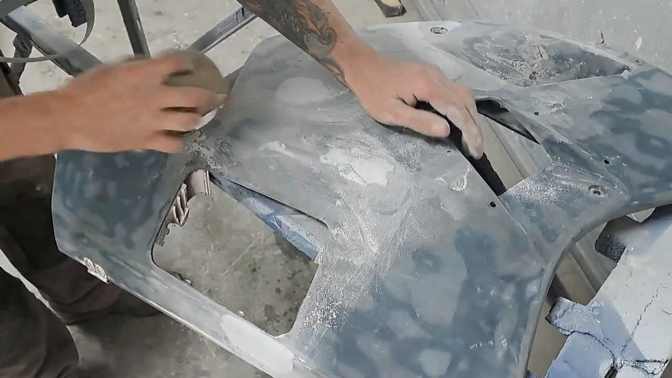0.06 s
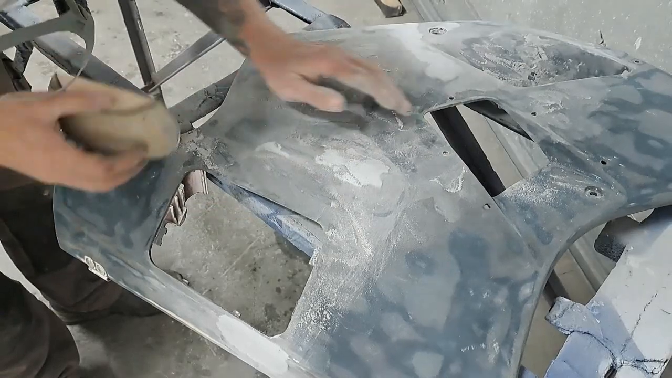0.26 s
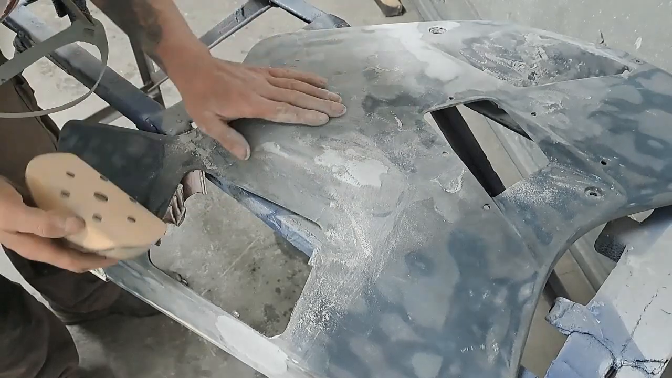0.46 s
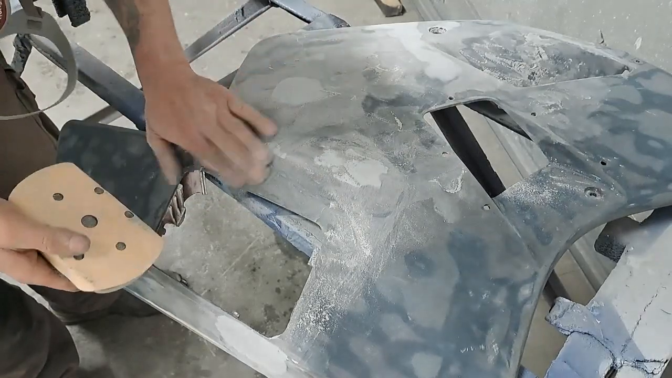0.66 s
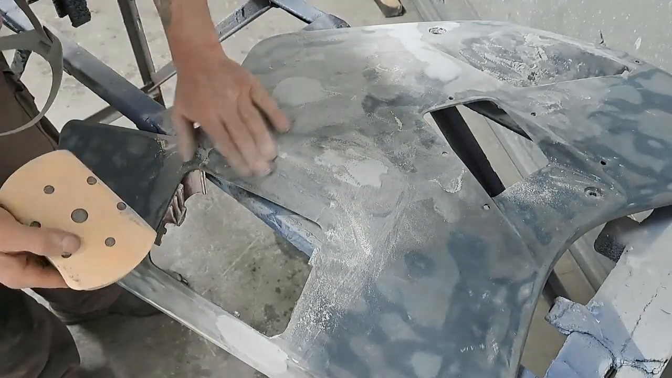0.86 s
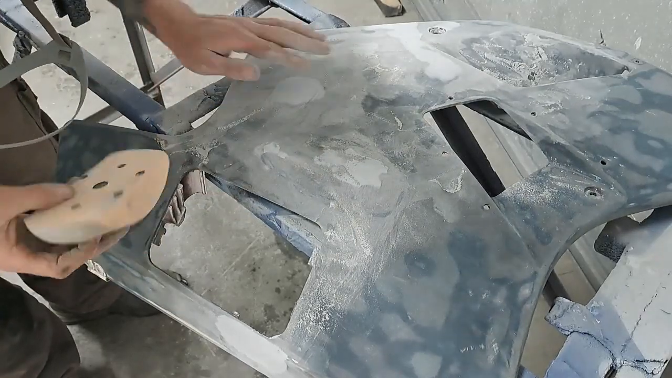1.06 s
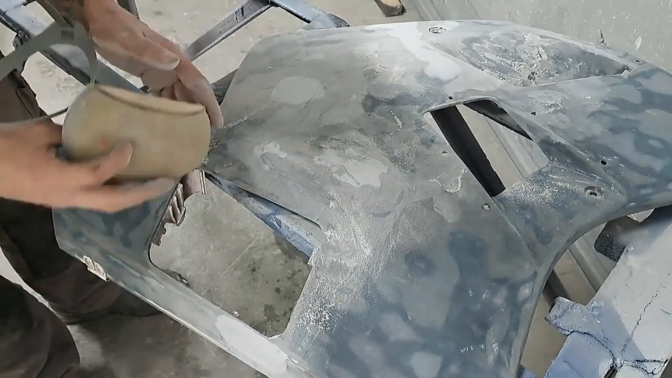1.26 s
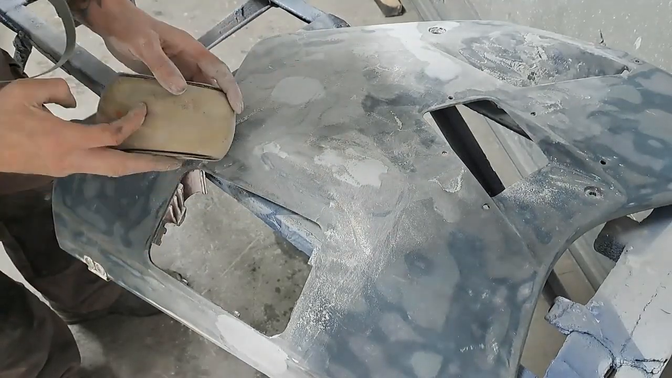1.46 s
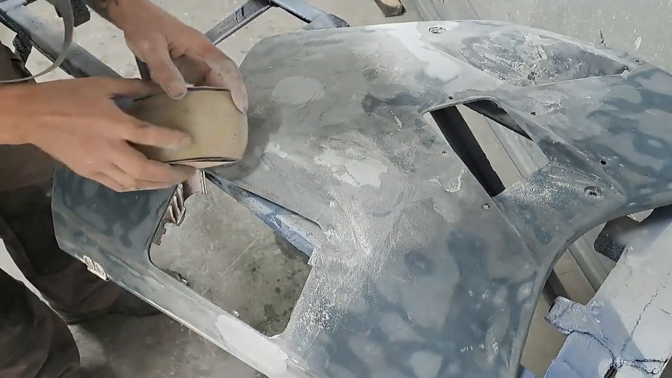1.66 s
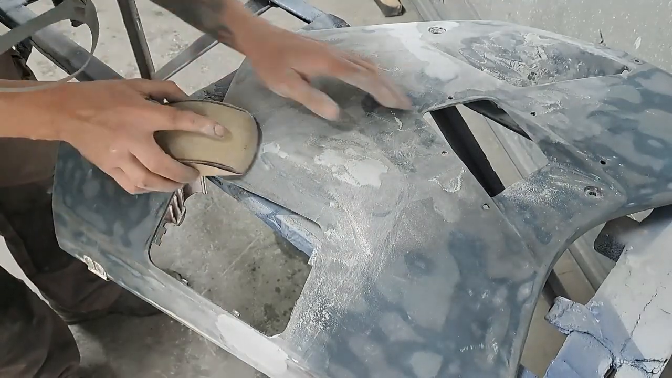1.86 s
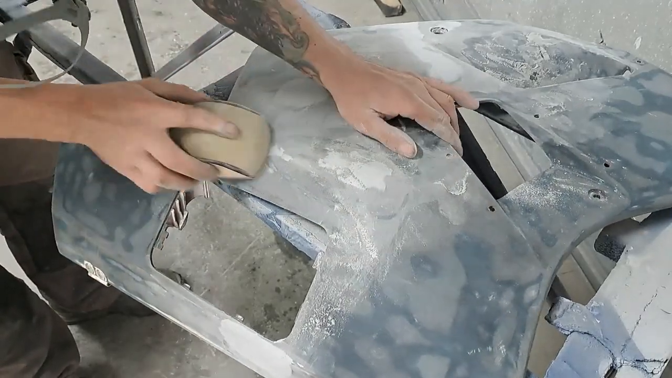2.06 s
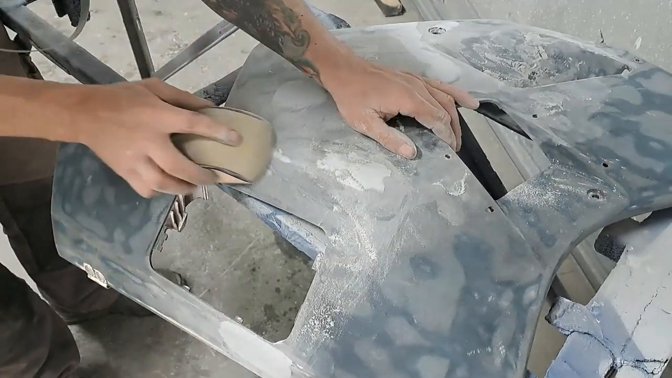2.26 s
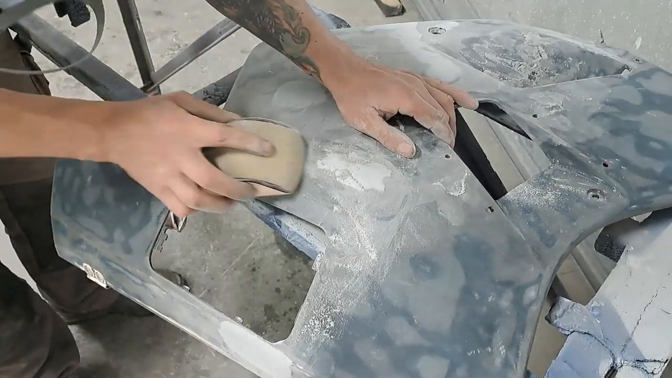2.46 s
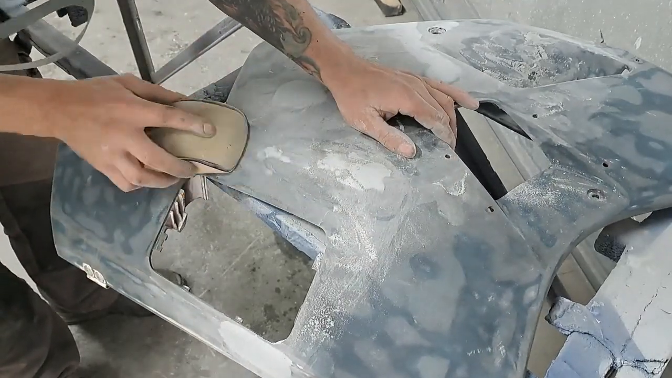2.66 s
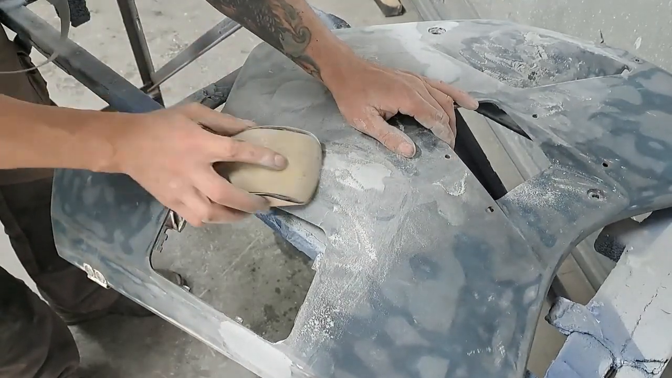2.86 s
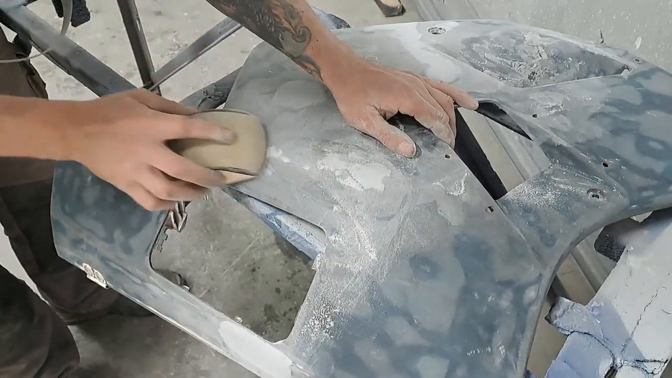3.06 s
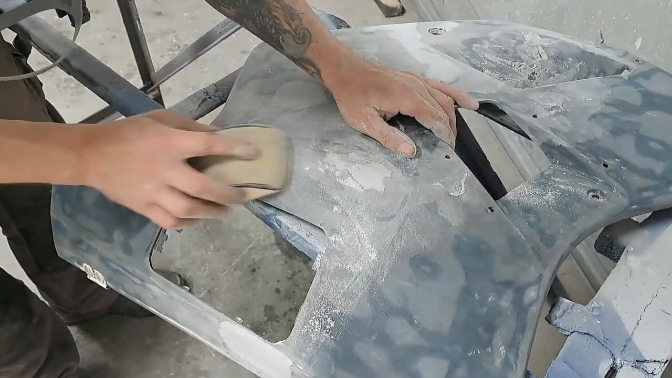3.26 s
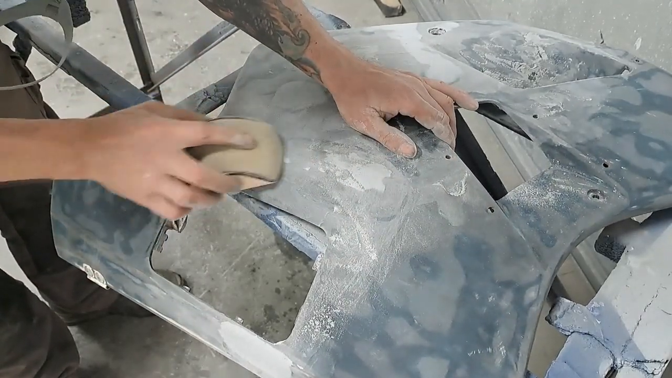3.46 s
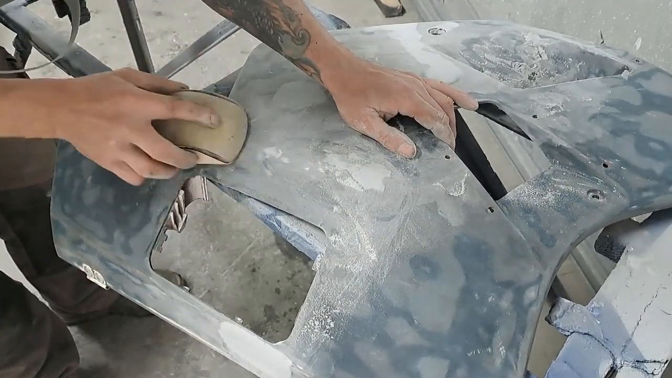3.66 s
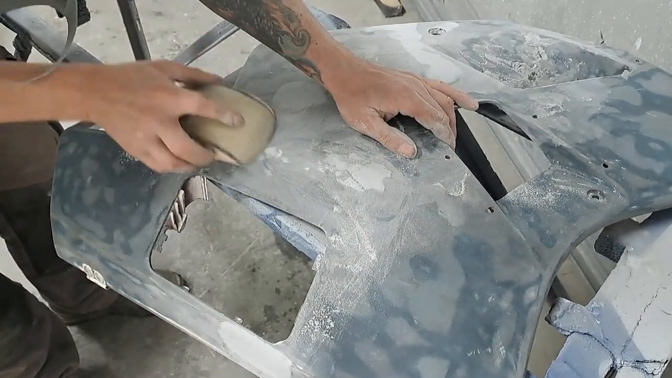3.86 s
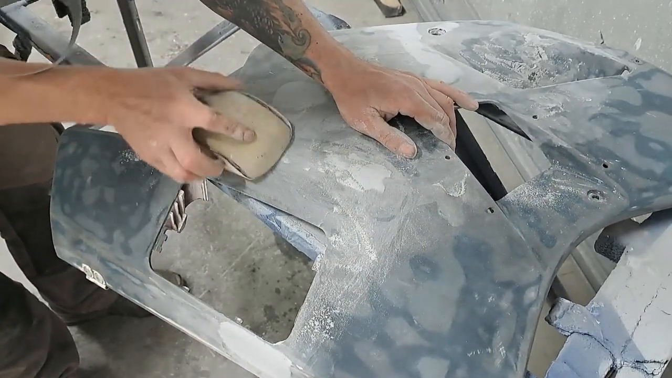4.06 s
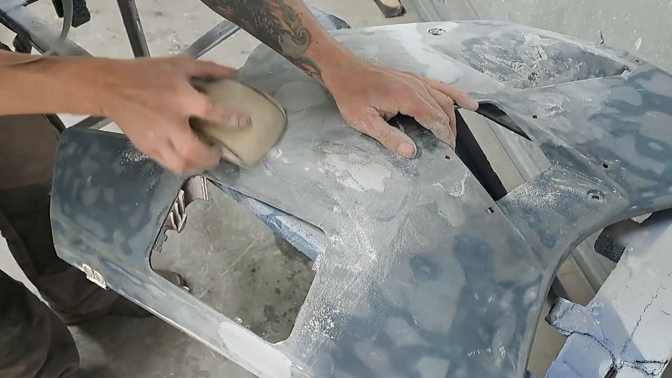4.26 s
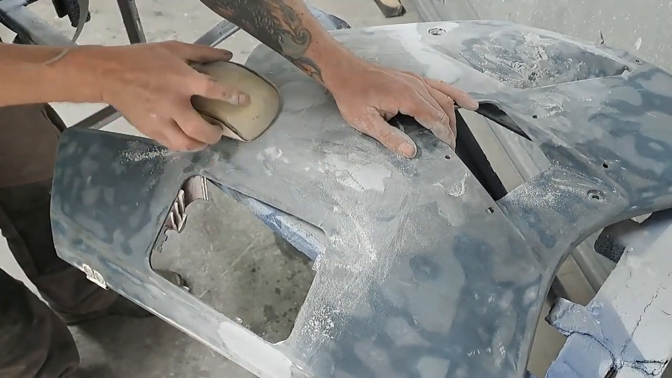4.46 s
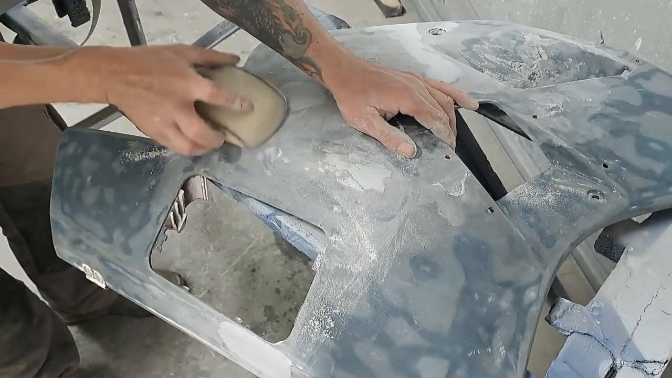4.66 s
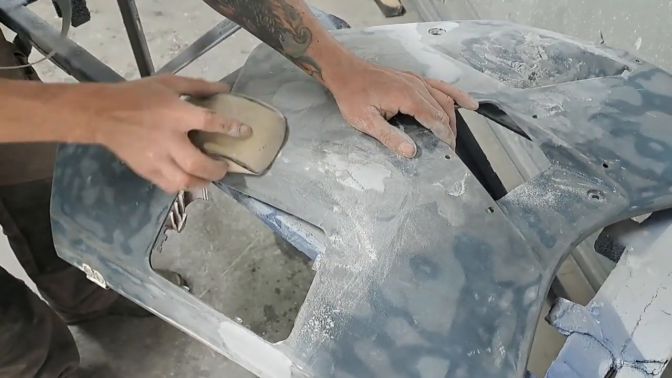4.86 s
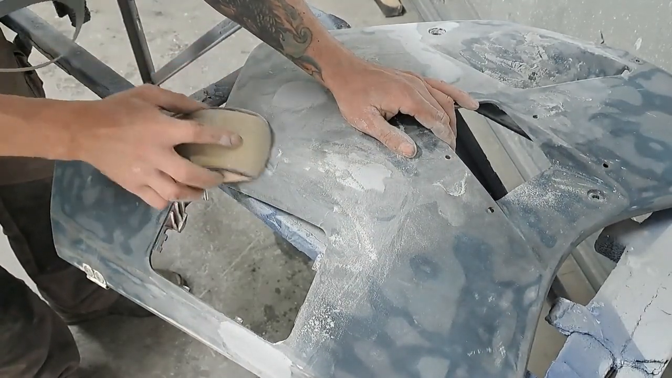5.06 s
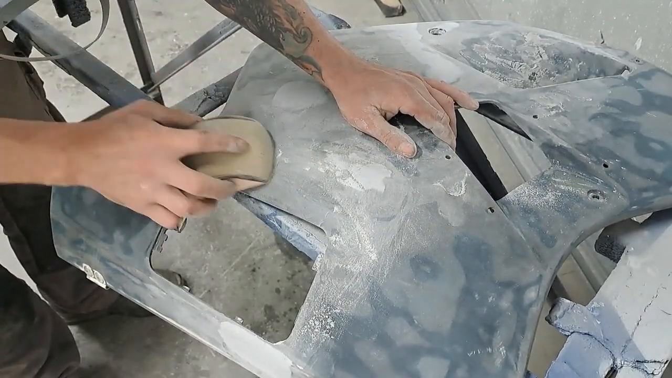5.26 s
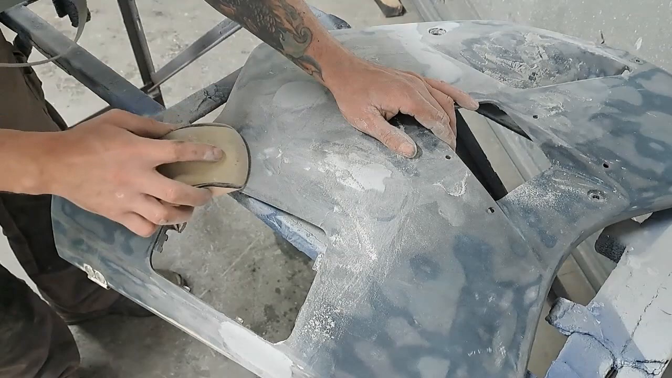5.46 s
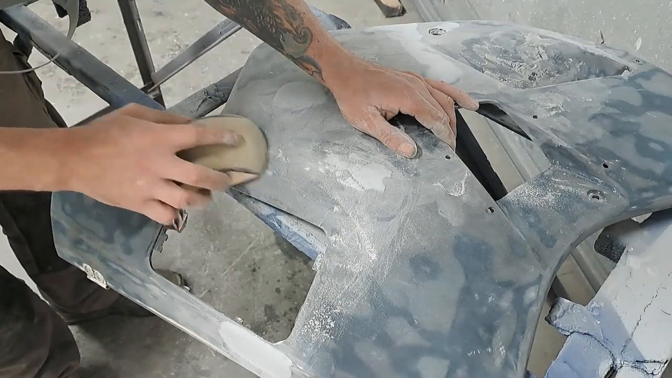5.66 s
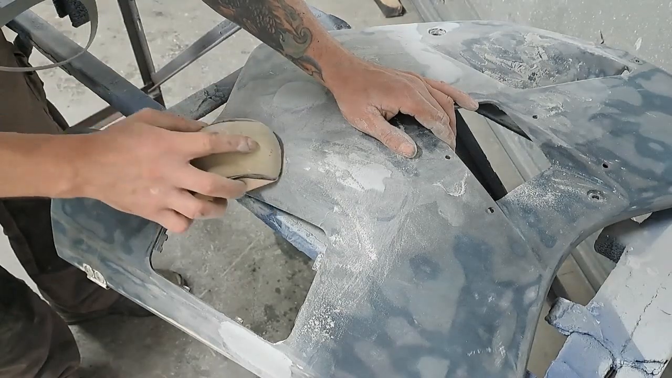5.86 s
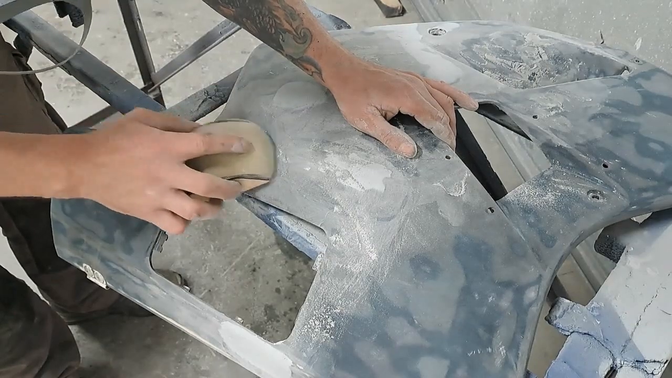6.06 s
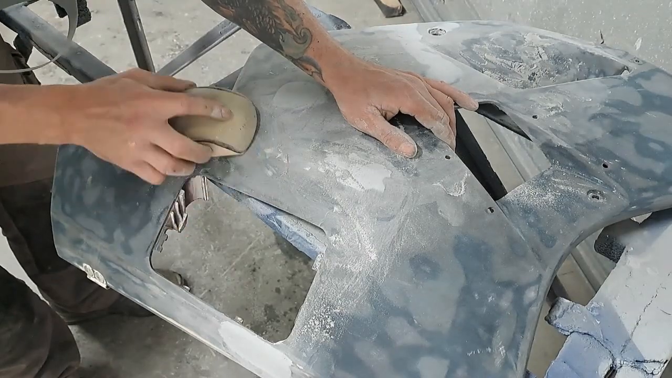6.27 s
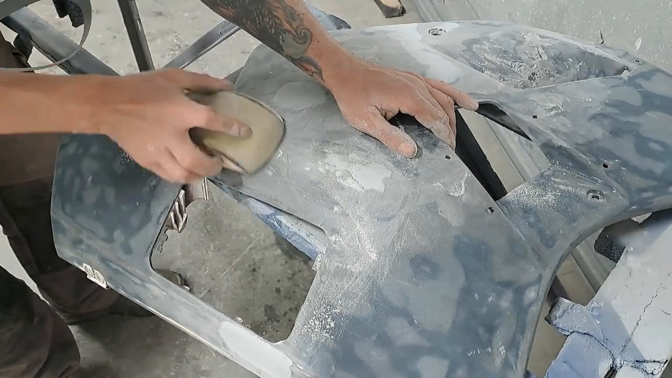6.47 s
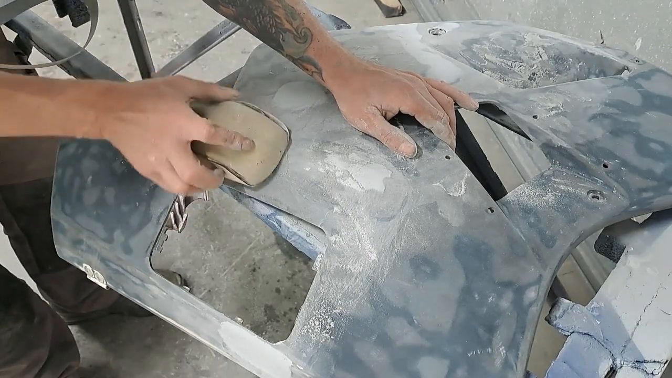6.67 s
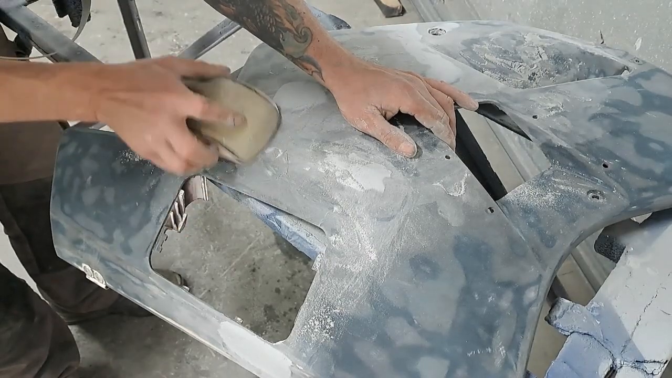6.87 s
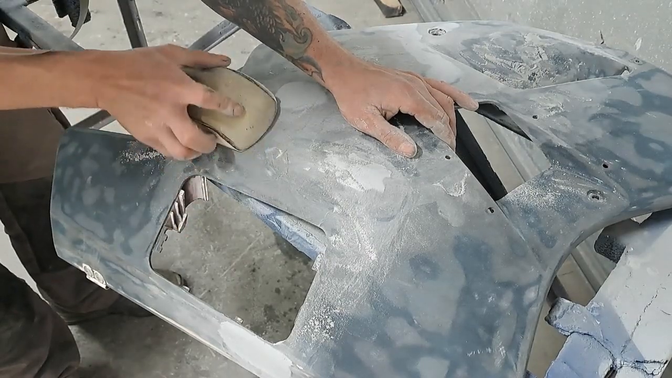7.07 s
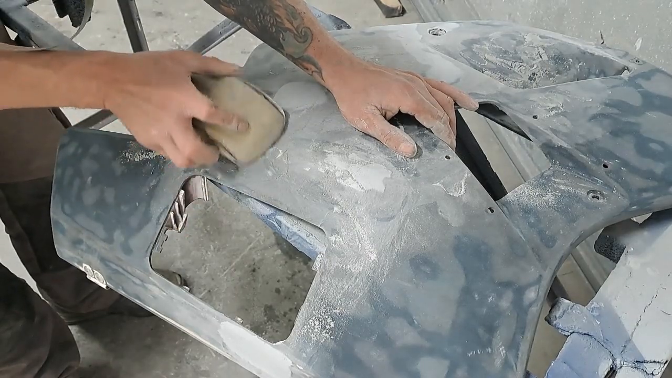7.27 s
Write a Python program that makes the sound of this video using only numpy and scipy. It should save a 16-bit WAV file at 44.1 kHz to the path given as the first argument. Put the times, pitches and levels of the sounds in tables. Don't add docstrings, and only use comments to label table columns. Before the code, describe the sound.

Palm wipes dust off a thin plastic panel, a hand thuds onto it, then a sanding block rasps back and forth in quick strokes.

```python
import sys
import numpy as np
from scipy import signal
from scipy.fft import rfft, irfft
from scipy.io import wavfile
from scipy.ndimage import uniform_filter1d

SR = 44100
rng = np.random.default_rng(int(sys.argv[2]) if len(sys.argv) > 2 else 0)


def volts_from_db(level):
    exponent = np.asarray(level, float) / 20
    return 10 ** exponent


def unload_audio(sound):
    columns = np.transpose(np.atleast_2d(sound))
    steps = np.round(np.clip(columns, -1, 1) * 32767)
    wavfile.write(sys.argv[1], SR, steps.astype(np.int16))


N = 322365


def evened(x):
    return x / np.sqrt(np.mean(abs(x) ** 2) + 1e-20)


def read(points, hz, column=1):
    table = np.transpose(points)
    return np.interp(np.log(hz + 1), np.log(table[0] + 1), table[column])


def add(mix, s, sound):
    part = mix[round(s * SR):][:len(sound)]
    part += sound[:len(part)]


def drift(shape, bins, frames):
    across = uniform_filter1d(rng.standard_normal(shape), size=bins, axis=0)
    return evened(uniform_filter1d(across, size=frames, axis=1))


def humps(modes, hz):
    return np.sqrt(sum(volts_from_db(db) ** 2 / (1 + (2 * (hz - f) / w) ** 2) ** 2 for f, w, db in modes))


# (frequency [Hz], shared share [0-1])
LIKENESS = [(60, 1), (150, 0.37), (380, 0.75), (950, 0.33), (2380, 0.077), (5980, 0.071), (15000, 0.054)]


def paired(a, b, hz):
    lag_s = -5 / 44100
    same = np.clip(read(LIKENESS, hz), 0, 1)
    right = same * a * np.exp(2j * np.pi * hz * lag_s) + np.sqrt(1 - same ** 2) * b
    return np.array([a, right])


# (frequency [Hz], left minus right [dB])
PORT_BALANCE = [(60, -6), (240, -3.5), (950, -3), (3770, -15), (15000, 8)]


def noise_pair(gain):
    hz = np.fft.rfftfreq(N, 1 / SR)
    sides = volts_from_db(np.outer([.5, -.5], read(PORT_BALANCE, hz)))
    white = rfft(rng.standard_normal((2, N)))
    pair = irfft(paired(*white, hz) * sides * gain(hz), N)
    return pair / np.std(pair.mean(0))


def swells(groups, t, smooth_s, over_first=0, drag=1):
    power, speed = 1e-10, 0
    for rows, slopes, way in groups:
        s, held, first, *others = np.transpose(rows)[:, :, None]
        early, late = np.maximum(s - t, 0), np.maximum(t - s - held, 0)
        inside = np.clip(t - s, 0, held)
        levels = [first, *(over_first * first + db for db in others)]
        parts = []
        for db, (rise, lean, fall) in zip(levels, slopes):
            level_db = db + lean * inside - rise * early - fall * late
            parts.append((volts_from_db(level_db) ** 2).sum(0))
        part = np.array(parts)
        power = power + part
        speed = speed + way * np.sqrt(part)
    power = np.minimum(power, drag * power + (1 - drag) * speed ** 2)
    return uniform_filter1d(10 * np.log10(power), max(int(smooth_s / (t[1] - t[0])), 1), axis=1)


# (frequency [Hz], density [dB per Hz])
AIR_COLOUR = [(30, -6), (229, -8), (496, -20), (900, -20), (2500, -54), (3600, -33), (4400, -21),
              (7400, -19.5), (8400, -25), (15500, -27)]


def workshop_hush():
    return volts_from_db(-54.5 - 15.5) * noise_pair(lambda hz: volts_from_db(read(AIR_COLOUR, hz)))


# (frequency [Hz], width [Hz], level [dB])
SWAY_MODES = [(57.4, 34, 5.5), (77, 13, 0)]
DRUM_MODES = [(125.6, 50, 0.5), (200.4, 71, 0.5), (211, 14, -10)]
FLEX_MODES = [(370, 270, 2), (450, 29, -21), (595, 196, 6), (760, 840, 0)]
# (time [s], held [s], sway [dB], drum [dB], flex [dB])
SHIFTS = [(0.052, 0.092, -53, -51.5, -58.5), (0.278, 0.039, -58, -66, -64), (0.403, 0.083, -49, -56.5, -61),
          (0.573, 0.17, -61, -64, -64), (0.814, 0.058, -51, -52.5, -61), (0.973, 0.09, -52, -55, -64.5),
          (1.358, 0.036, -62, -67, -89), (1.49, 0.008, -65, -75, -68), (1.662, 0.011, -66, -78, -87),
          (1.901, 0.0038, -53, -52, -60), (2.104, 0.1, -48, -49, -49.5)]
FINGER_GRIPS = [
    (0.355, 0.03, -70, -64, -61),
    (1.757, 0.055, -80, -67, -67),
    (4.985, 0.03, -72, -55, -63),
]
ROCKS = [(2.369, 0.003, -54, -56, -53.5), (2.49, 0.009, -54, -55, -58), (2.606, 0.006, -55, -54.5, -65),
         (2.764, 0.014, -60, -56, -59.5), (3.05, 0.046, -46.5, -52.5, -50.5), (3.295, 0.001, -65, -58, -65),
         (3.376, 0.18, -57, -53.5, -62), (3.625, 0.12, -68, -58, -55.5), (3.844, 0.18, -55, -58.5, -65),
         (4.094, 0.021, -57.5, -54.5, -59.5), (4.358, 0.046, -76, -56, -60), (4.569, 0.094, -67, -55, -68),
         (4.782, 0.038, -56, -55.5, -57), (5.01, 0.17, -65, -60, -56), (5.423, 0.074, -57, -57, -57),
         (5.707, 0.003, -65, -57.5, -56.5), (5.886, 0.11, -55.5, -74, -64), (6.038, 0.006, -67, -70, -56),
         (6.317, 0.088, -62, -74, -65), (6.468, 0.046, -74, -63, -59), (6.776, 0.001, -54, -54, -60),
         (7.002, 0.065, -65, -54, -58.5), (7.198, 0.053, -69, -59, -55)]
# (rise [dB/s], lean [dB/s], fall [dB/s])
SHIFT_SLOPES = [(300, -3, 100), (168, -2, 95), (90, -9, 160)]
ROCK_SLOPES = [(254, -5, 63), (122, -3, 79), (41, -12, 32)]
# (sway [dB], drum [dB], flex [dB])
ROCK_LIMIT_DB = (-50, -49, -49)
# (sway [dB], drum [dB], flex [dB])
RUMBLE_TRIM_DB = (-4.5, -5.5, -0.5)


def panel_rumble(steady=0.059, flex_follows=0.4, block=256):
    t = np.arange(0, N + block, block) / SR
    motions = [(SHIFTS, SHIFT_SLOPES, 1), (FINGER_GRIPS, GRAB_SLOPES, 1), (ROCKS, ROCK_SLOPES, 1)]
    levels = swells(motions, t, smooth_s=0.0085)
    body = np.maximum(rubbing(t)[2], -56)
    levels[2] += flex_follows * (body - uniform_filter1d(body, size=40))
    out = 0
    groups = (SWAY_MODES, DRUM_MODES, FLEX_MODES)
    for db, most_db, trim_db, modes in zip(levels, ROCK_LIMIT_DB, RUMBLE_TRIM_DB, groups):
        rumble = noise_pair(lambda hz: humps(modes, hz))
        swell = uniform_filter1d(uniform_filter1d(rumble.mean(0) ** 2, size=1500), size=1500)
        gain = np.interp(np.arange(N) / SR, t, volts_from_db(np.minimum(db, most_db) + trim_db))
        out = out + gain * rumble / (swell + 0.089) ** (steady / 2)
    return out


def nudged_mode(rows, mode_hz, scatter, stretch=1.15, lead=0.31, left_db=-3.0):
    swell = np.zeros(N)
    warp = np.log(.5) / np.log(lead)
    for s, length_s, db in rows:
        u = np.arange(0, 1, 1 / (SR * stretch * length_s))
        start_s = max(s - lead * stretch * length_s, 0)
        add(swell, start_s, volts_from_db(2 * db - 5.5) * np.sin(np.pi * u ** warp) ** 2)
    wander = np.interp(np.arange(N), np.arange(0, N + 3000, 3000), rng.uniform(-1, 1, N // 3000 + 2))
    hum = np.sin(2 * np.pi * np.cumsum(mode_hz * (1 + scatter * wander)) / SR)
    return np.sqrt(swell) * hum * volts_from_db([[left_db / 2], [-left_db / 2]])


# (time [s], length [s], level [dB])
DRUM_PUSHES = [(0.066, 0.072, -50), (0.197, 0.04, -67), (0.281, 0.062, -60.8), (0.398, 0.13, -48),
               (0.528, 0.066, -63), (0.749, 0.16, -64), (0.868, 0.085, -48.5), (0.938, 0.06, -52),
               (1.019, 0.05, -52), (1.69, 0.07, -64), (1.9, 0.16, -57), (2.278, 0.06, -44),
               (2.365, 0.038, -49), (2.514, 0.127, -55), (2.593, 0.036, -55), (2.712, 0.1, -70),
               (2.776, 0.097, -52.5), (2.88, 0.037, -62.6), (3.071, 0.15, -44.5), (3.3, 0.106, -46.5),
               (3.473, 0.15, -50.5), (3.609, 0.043, -54), (3.669, 0.049, -52), (3.783, 0.051, -53),
               (3.909, 0.094, -58), (4.061, 0.2, -52), (4.289, 0.069, -56), (4.416, 0.051, -55),
               (4.544, 0.11, -66), (4.658, 0.068, -55.5), (4.812, 0.086, -56), (4.999, 0.24, -47),
               (5.153, 0.052, -48), (5.246, 0.07, -62), (5.314, 0.058, -57), (5.481, 0.12, -53),
               (5.712, 0.16, -51.5), (5.873, 0.081, -55), (5.975, 0.064, -53.5), (6.076, 0.05, -54),
               (6.248, 0.051, -63.7), (6.365, 0.116, -63), (6.471, 0.11, -65), (6.654, 0.064, -57),
               (6.768, 0.12, -51.5), (6.898, 0.13, -61), (7.063, 0.16, -61), (7.197, 0.13, -51.5)]
SWAY_PUSHES = [(0.105, 0.1, -50), (0.432, 0.17, -53), (0.851, 0.07, -50), (1.014, 0.14, -53),
               (1.098, 0.046, -56.2), (1.675, 0.12, -56), (1.932, 0.123, -52), (2.376, 0.16, -50),
               (2.497, 0.046, -47), (2.624, 0.15, -51), (2.829, 0.046, -53), (3.05, 0.13, -53),
               (3.121, 0.064, -48.3), (3.303, 0.062, -57), (3.381, 0.145, -50.5), (3.502, 0.068, -52),
               (3.63, 0.054, -59), (3.706, 0.058, -57.0), (3.853, 0.18, -59), (4.166, 0.12, -55),
               (4.367, 0.19, -59.1), (4.501, 0.06, -58), (4.588, 0.111, -57), (4.783, 0.064, -58.3),
               (4.851, 0.049, -59.4), (5.06, 0.18, -54), (5.425, 0.16, -62), (5.507, 0.062, -59.0),
               (5.57, 0.037, -59), (5.718, 0.111, -55), (5.974, 0.16, -56), (6.336, 0.16, -61),
               (6.791, 0.19, -55), (7.015, 0.051, -58), (7.074, 0.069, -56), (7.237, 0.16, -57)]


def low_hums():
    drum = nudged_mode(DRUM_PUSHES, mode_hz=126, scatter=0.037)
    sway = nudged_mode(SWAY_PUSHES, mode_hz=55.1, scatter=0.0996)
    return drum + sway


# (time [s], length [s], slip rate [Hz], level [dB], ring [dB])
STAND_CREAKS = [
    (.785, .06, 216, -50, -22),
    (1.04, .07, 215, -59, -13),
    (1.866, .055, 218, -50, -24),
]


def stand_creaks():
    mix = np.zeros(N)
    t = np.arange(SR // 2) / SR
    for s, length_s, hz, db, ring_db in STAND_CREAKS:
        rise = np.clip(t / length_s, 0, 1)
        swell = np.sin(np.pi * rise) ** 2
        stack = sum(volts_from_db(level) * np.sin(2 * np.pi * k * hz * t) for k, level in enumerate((0, -7, -18), 1))
        linger = volts_from_db(ring_db - 13 * t) * rise * np.clip((.3 - t) / 0.034, 0, 1)
        add(mix, s, volts_from_db(db) * (swell * stack + linger * np.sin(2 * np.pi * hz * t)))
    return mix


# (time [s], peak [dB], brightness [dB/octave], ring factor [1])
PANEL_KNOCKS = [(0.355, -39.5, 1, 0.37), (0.378, -41.5, -4, 0.89), (0.418, -44, -3, 0.68),
                (1.754, -53, 1, 1), (2.107, -40, 19, 0.29), (2.108, -23, 3, 0.3), (2.131, -25, -0.5, 0.43),
                (2.15, -26.5, -7, 0.96), (2.162, -33, 1, 0.35), (2.176, -35.5, 3, 0.75),
                (2.204, -37, -6, 0.73), (3.029, -42.5, 4, 0.7), (3.435, -42, -4, 0.4),
                (3.512, -44, -3, 0.53), (4.975, -45, 1, 0.6), (5.013, -41, -3.5, 0.56),
                (5.416, -64, 9, 0.59), (5.553, -46, 13, 0.8), (2.225, -43, 1, 0.96)]
# (frequency [Hz], level [dB], t60 [s])
PANEL_MODES = [(57, -30, 0.25), (108, -1, 0.18), (131, -5, 0.2), (177, 4, 0.092), (209, 6, 0.099),
               (310, 2, 0.14), (392.4, -2, 0.27), (444.3, -5, 0.39), (639, 0.5, 0.14), (806, -4, 0.15),
               (1000, -11.5, 0.1)]


def panel_knocks():
    mix = np.zeros(N)
    t = np.arange(SR // 2) / SR
    for s, peak_db, tilt_db, ring in PANEL_KNOCKS:
        out = 0
        for hz, level, t60 in PANEL_MODES:
            spot_db = 2 * rng.standard_normal()
            mode_db = level + tilt_db * np.log2(hz / 200) + spot_db - 60 * t / (t60 * ring)
            out = out + volts_from_db(mode_db) * np.sin(2 * np.pi * hz * t)
        out = out * (1 - np.exp(-t / 0.0018))
        add(mix, s, volts_from_db(peak_db) * out / abs(out).max())
    return mix


# (centre time [s], length [s], level [dB], frequency [Hz])
HOLLOW_NOTES = [(0.056, .06, -61, 378), (0.56, .06, -66, 325), (1.772, .05, -59, 710),
                (1.96, .05, -61, 200), (2.0, .06, -60, 873), (2.085, .03, -50, 835),
                (2.111, 0.017, -32.5, 203), (2.166, .015, -42, 750), (2.187, 0.0294, -40, 450),
                (2.185, 0.016, -44, 686), (2.784, .08, -55.5, 600), (3.038, .06, -59, 594),
                (3.692, .05, -51, 582), (4.975, .03, -51.5, 251), (5.04, .05, -53, 567),
                (5.19, .04, -55, 620), (5.274, .04, -51, 370), (5.429, .04, -52, 584),
                (5.572, .05, -52.5, 594), (5.635, .05, -55, 370), (7.192, .07, -53.5, 656)]


def flex_notes():
    mix = np.zeros(N)
    for s, length_s, db, hz in HOLLOW_NOTES:
        t = np.arange(0, length_s, 1 / SR)
        add(mix, s - length_s / 2, volts_from_db(db) * np.sin(np.pi * t / length_s) * np.sin(2 * np.pi * hz * t))
    return mix


# (time [s], level [dB], t60 [s], top [Hz])
CATCH_TICKS = [
    (.086, -24, .06, 11500),
    (1.21, -59, .02, 11000),
    (1.292, -52, .04, 6500),
    (1.356, -48, .06, 8000),
    (1.718, -48, .02, 11500),
]


def catch_ticks():
    mix = np.zeros(N)
    t = np.arange(1500) / SR
    for s, db, t60, top_hz in CATCH_TICKS:
        b, a = signal.butter(N=2, Wn=(4000, top_hz), btype="band", fs=SR)
        snap = signal.lfilter(b, a, rng.standard_normal(1501))[1:]
        add(mix, s, volts_from_db(db - 60 * t / t60) * snap)
    return mix


# (time [s], length [s], frequency [Hz], level [dB])
FOAM_SQUEAKS = [
    (2.045, .04, 1620, -46),
    (4.67, .06, 1700, -47),
]


def foam_squeaks():
    mix = np.zeros(N)
    for s, length_s, hz, db in FOAM_SQUEAKS:
        t = np.arange(0, length_s, 1 / SR)
        tone = np.sin(2 * np.pi * hz * t + 0.81 * np.sin(2 * np.pi * 40 * t))
        add(mix, s, volts_from_db(db) * np.sin(np.pi * t / length_s) * tone)
    return mix


def contacts():
    mix = stand_creaks() + panel_knocks() + flex_notes() + catch_ticks() + foam_squeaks()
    return mix * volts_from_db([[-1.2], [1.2]])


# (full speed from [s], held [s], rasp [dB], hiss over rasp [dB], body over rasp [dB])
PALM_WIPES = [
    (0.044, 0.058, -35.5, 2, -9.5),
    (0.435, 0.071, -55.5, -2, -5.5),
    (0.6, 0.053, -53, -3.5, -3.5),
    (0.712, 0.06, -45, -3.5, -8.5),
    (0.944, 0.088, -45, -1.5, -8),
    (1.425, 0.11, -56.5, -8, -8.5),
    (1.6, 0.075, -70, -8, -7.5),
    (1.772, 0.067, -56, -6.5, -7),
    (1.977, 0.088, -49.5, -1.5, -5),
]
GRABS = [
    (0.082, 0.012, -50, 20.5, -20),
    (1.291, 0.031, -75.5, -12, -7),
    (1.356, 0.025, -67, -4, -19),
    (1.47, 0.012, -55, -11, -8),
    (1.7, 0.013, -58.5, -5, -9),
]
PUSH_STROKES = [(2.123, 0.09, -40.5, -2.5, -4.5), (2.474, 0.082, -40, -2, -6),
                (2.805, 0.092, -39.5, -0.5, -5.5), (3.138, 0.086, -38, 1.5, -5.5),
                (3.501, 0.037, -38, -0.5, -7.5), (3.793, 0.034, -41, -2.5, -6),
                (4.059, 0.04, -38, -1, -6.5), (4.33, 0.033, -36.5, -3, -8.5),
                (4.586, 0.036, -39, 0.5, -6.5), (4.833, 0.026, -37.5, -0.5, -7.5),
                (4.994, 0.001, -45, -3.5, -4), (5.305, 0.047, -44, -2, -4), (5.588, 0.054, -41, -4, -5.5),
                (5.852, 0.047, -44, -5, -5), (6.119, 0.049, -45, -3, -4), (6.41, 0.036, -38, -0.5, -5.5),
                (6.677, 0.034, -37.5, -1, -7.5), (6.939, 0.036, -40, -2, -6.5),
                (7.199, 0.043, -42.0, -4.5, -6.5)]
PULL_STROKES = [(2.302, 0.075, -43.5, -5.5, -6.5), (2.645, 0.067, -40.5, -4.5, -7.5),
                (2.993, 0.054, -38, 0, -6.5), (3.347, 0.05, -37.5, -1.5, -7.5),
                (3.652, 0.045, -43, -5, -7.5), (3.944, 0.033, -40, -3, -6), (4.219, 0.022, -39, -4.5, -9.5),
                (4.48, 0.016, -39, -2, -8), (4.736, 0.019, -38, -5.5, -9), (5.158, 0.034, -46, -1.5, -4.5),
                (5.441, 0.037, -44.5, -3, -4.5), (5.724, 0.037, -44, -5.5, -5.5),
                (5.999, 0.027, -45.5, -5, -5), (6.303, 0.023, -40.5, -3, -6), (6.568, 0.026, -42, -2.5, -6),
                (6.825, 0.025, -42.5, -2.5, -4.5), (7.07, 0.043, -44.5, -5, -4.5)]
# (rise [dB/s], lean [dB/s], fall [dB/s])
PALM_SLOPES = [(171, 7, 160), (186, -5, 197), (155, 0, 151)]
GRAB_SLOPES = [(1450, -5, 230), (1500, -5, 440), (1500, -5, 400)]
PUSH_STROKE_SLOPES = [(335, 36, 158), (356, 3.4, 244), (222, 26, 100)]
PULL_STROKE_SLOPES = [(242, 70, 157), (297, 113, 276), (109, 36, 100)]
TURN_SHARE = [
    [1],
    [1],
    [0.78],
]


def rubbing(t):
    motions = [(PALM_WIPES, PALM_SLOPES, 1), (GRABS, GRAB_SLOPES, 1),
               (PUSH_STROKES, PUSH_STROKE_SLOPES, 1), (PULL_STROKES, PULL_STROKE_SLOPES, -1)]
    return swells(motions, t, smooth_s=0.012, over_first=0.99, drag=np.array(TURN_SHARE))


# (time [s], frequency [Hz], level [dB])
COLOUR_SPOTS = [(2.17, 900, 5), (2.17, 2410, -2.3), (2.34, 1060, 6), (2.34, 2050, 2), (2.511, 900, -1),
                (2.51, 3350, 3.5), (2.68, 900, 6), (2.85, 1250, -1.5), (3.02, 3950, 2), (3.37, 3350, -1),
                (3.37, 6640, 1.9), (3.52, 900, -3), (3.68, 1470, 3), (3.68, 2050, 1.5), (3.68, 3950, -2.3),
                (3.68, 5490, 1.5), (3.81, 1250, 4), (3.81, 1740, -3), (4.34, 2800, 1), (4.49, 2390, 3.5),
                (4.6, 900, -9), (4.6, 2850, 2.5), (5.0, 1250, 2.7), (5.0, 2410, -3), (5.33, 900, 7.5),
                (5.46, 2390, -3), (5.61, 900, -3), (5.61, 3350, 3), (5.88, 2380, -1.6), (6.01, 1250, 6),
                (6.01, 3350, -2), (6.0, 2000, -1), (5.75, 2050, 1), (6.43, 900, -3), (6.58, 900, 3),
                (6.58, 1250, -1.6), (6.58, 2410, 3), (6.69, 2050, 1.5), (6.96, 2050, 1.7), (7.09, 900, -1),
                (7.22, 900, -12), (7.22, 2050, 1.6), (7.22, 2900, 4.5),
                (0.02, 1110, 6), (0.04, 12500, 1.5), (0.2, 1350, -7), (0.33, 3250, -8), (0.44, 3300, -5),
              (0.85, 800, 18), (1.2, 1050, 11), (1.3, 9500, -5), (1.5, 900, 9), (1.49, 3400, 4),
              (1.79, 1000, 13), (2.54, 4300, 5), (3.03, 8500, 1), (5.09, 1300, 3)]


def spot_colour(hz, t, spot_s=0.043, spot_octaves=0.14):
    s, spot_hz, spot_db = np.transpose(COLOUR_SPOTS)
    across = np.exp(-(np.log2((hz[:, None] + 1) / spot_hz) / spot_octaves) ** 2 / 2)
    return (across * spot_db) @ np.exp(-((t - s[:, None]) / spot_s) ** 2 / 2)


# (frequency [Hz], left [dB], right [dB])
GRIT_COLOUR = [(283, -0.5, -3), (690, -16, -14), (1150, -16, -11.5), (1960, -10.5, -4.5),
               (3440, -12.5, -7.5), (4740, -12.5, -2.5), (6050, -13.5, -4), (6880, -14.5, -1),
               (7490, -8.5, -6), (8680, -10.5, -21), (9930, -10.5, -14.5), (12600, -9, -6.5),
               (14100, -11.5, -11), (15940, -14, -12)]
# (frequency [Hz], width [Hz], level [dB])
SINGING_PLACES = [(1375, 100, 4.5), (2000, 170, 0.5), (5460, 530, -1), (7100, 1500, -4.5)]


def grit(catches_per_s=14000, spread_db=0.5, patchy_db=0.86, flicker_db=0.47, hop=64, size=256):
    grain_db = spread_db * np.minimum(rng.exponential(1, (2, N)), 5)
    grains = volts_from_db(grain_db) * rng.choice([-1., 1.], (2, N))
    clicks = grains * (rng.random((2, N)) < catches_per_s / SR)
    hz, t, z = signal.stft(clicks, SR, nperseg=size, noverlap=size - hop)
    z = paired(z[0].T, z[1].T, hz).transpose(0, 2, 1)
    colour = volts_from_db([read(GRIT_COLOUR, hz, column=1), read(GRIT_COLOUR, hz, column=2)])
    z = z * colour[:, :, None] * np.clip(hz / 900, 0, 1)[:, None] ** 2

    power = np.mean(abs(z.mean(0)) ** 2, 1) * (1 + humps(SINGING_PLACES, hz) ** 2) * 4 / 3
    rasp, fine, body = rubbing(t)
    bands = ((body, 1000, 3000), (rasp, 4000, 8000), (fine, 9500, 15500))
    levels = np.array([db - 10 * np.log10(power[(hz > lo) & (hz < hi)].sum()) for db, lo, hi in bands])
    place = np.interp(np.log(hz + 1), np.log([2130, 4040, 6600, 10900]), [0, 0.5, 1.24, 2])
    weight = np.clip(1 - abs(place[:, None] - np.arange(3)), 0, 1)

    patches = drift(z.shape[1:], bins=5, frames=30)
    flicker = evened(uniform_filter1d(rng.standard_normal(len(t)), size=6))

    travel = evened(uniform_filter1d(uniform_filter1d(flicker, size=50), size=50))
    sung = humps(SINGING_PLACES, hz[:, None] * (1 + 0.05 * travel))
    z = z * np.sqrt(1 + sung ** 2 * np.clip((t - 1.9) / 0.16, 0.1, 1))
    field_db = spot_colour(hz, t) + weight @ levels + patchy_db * patches + flicker_db * flicker
    return signal.istft(z * volts_from_db(field_db), SR, nperseg=size, noverlap=size - hop)[1][:, :N]


def panel_singing(x, depth_db=3.0, top_hz=5000):
    hz, t, z = signal.stft(x, SR, nperseg=2048)
    modes = drift(z.shape[1:], bins=2, frames=6)
    gain = volts_from_db(depth_db * modes / (1 + (hz / top_hz) ** 2)[:, None])
    return signal.istft(z * evened(gain), SR, nperseg=2048)[1][:, :N]


def scene():
    return workshop_hush() + panel_rumble() + low_hums() + contacts() + panel_singing(grit())


# (frequency [Hz], closes below [dB per bin])
GATE_THRESHOLD = [(900, -125), (1400, -94), (1700, -91.5), (3250, -88.5), (3700, -87.5), (4000, -125)]


def hollow_quiet(x, waver_db=3.5, dropout_odds=2.4):
    hz, t, z = signal.stft(x, SR, nperseg=512)
    power = uniform_filter1d(uniform_filter1d(abs(z) ** 2, size=3, axis=1), size=5, axis=2)
    power_db = 10 * np.log10(power + 1e-20)
    waver = drift(z.shape[1:], bins=2, frames=7)
    open_db = 5.0 * (power_db.max(0) - read(GATE_THRESHOLD, hz)[:, None] - waver_db * waver)
    lost = (waver > dropout_odds) & ((hz > 2700) & (hz < 4300))[:, None]
    lost_db = -30 * uniform_filter1d(1. * lost, size=3, axis=1)
    shut_db = np.clip(np.minimum(open_db, lost_db), -30, 0)
    return signal.istft(z * volts_from_db(shut_db), SR, nperseg=512)[1][:, :N]


def top_cut(x):
    return signal.sosfilt(signal.butter(12, 15740, fs=SR, output="sos"), x)


def record(dry):
    low_pass = signal.firwin(767, 15780, window=("kaiser", 10), fs=SR)
    mix = signal.oaconvolve(hollow_quiet(dry), low_pass[None], "same")
    return top_cut(mix)


dry = scene()
out = record(dry)
unload_audio(out)
```